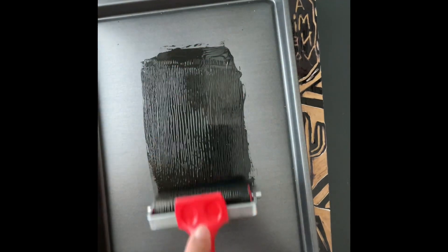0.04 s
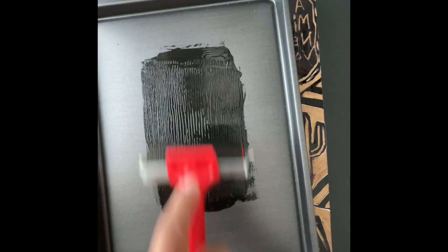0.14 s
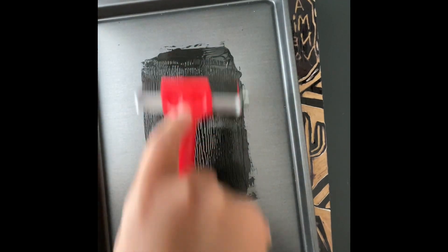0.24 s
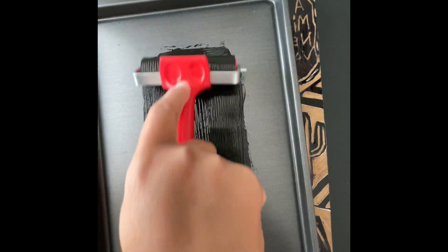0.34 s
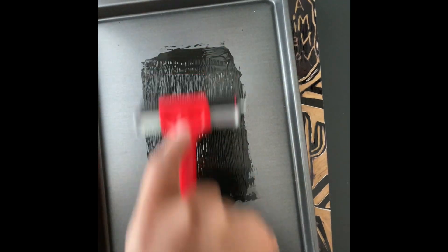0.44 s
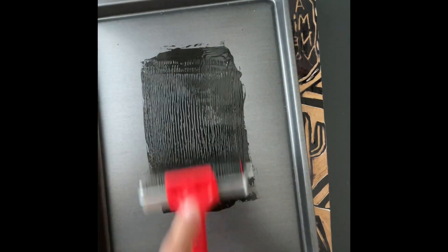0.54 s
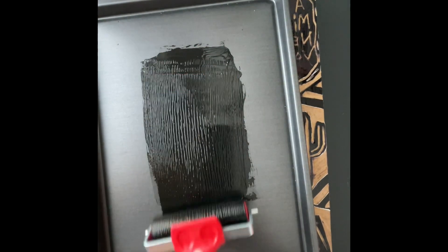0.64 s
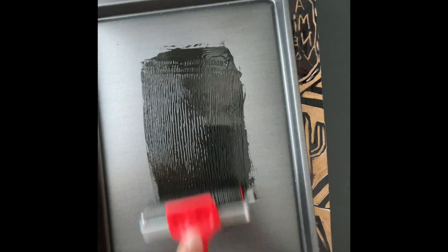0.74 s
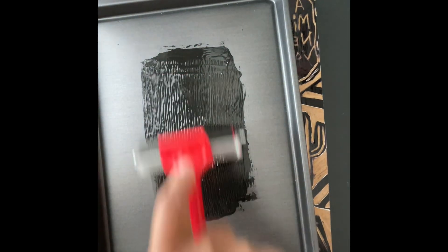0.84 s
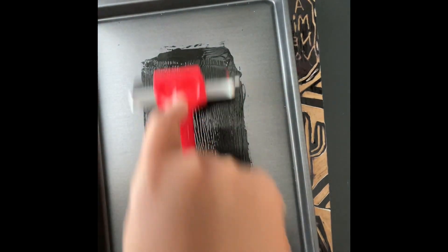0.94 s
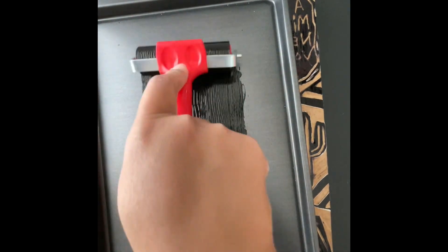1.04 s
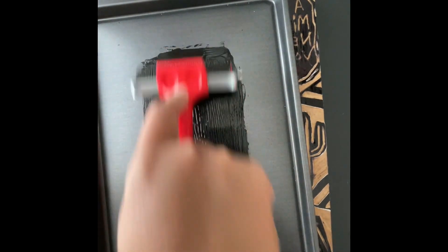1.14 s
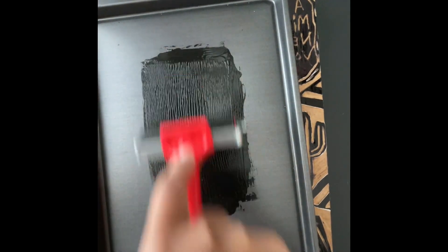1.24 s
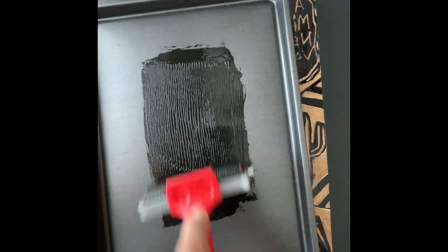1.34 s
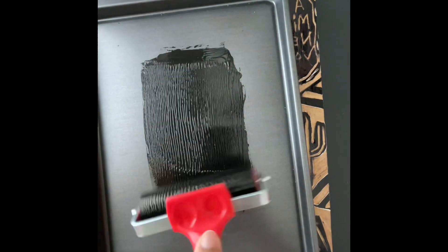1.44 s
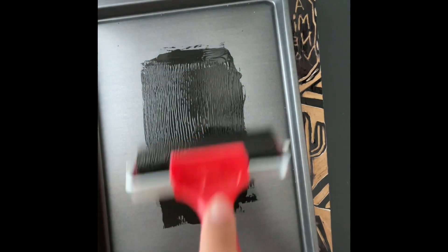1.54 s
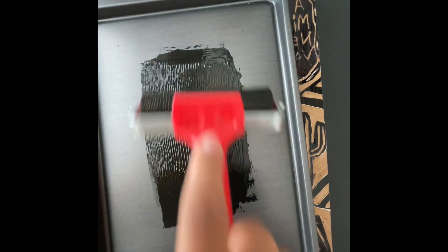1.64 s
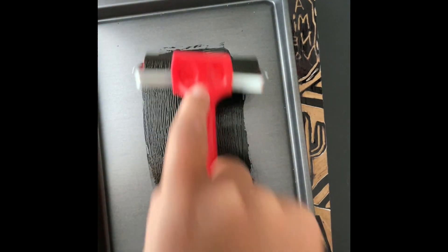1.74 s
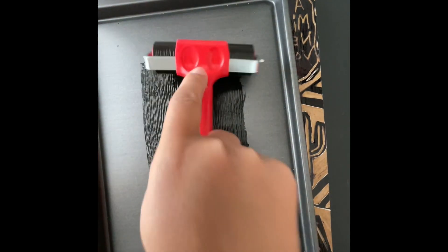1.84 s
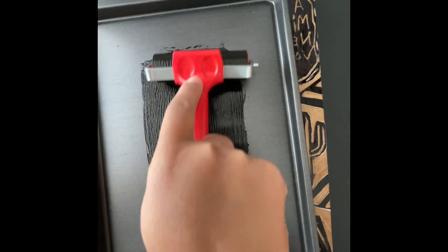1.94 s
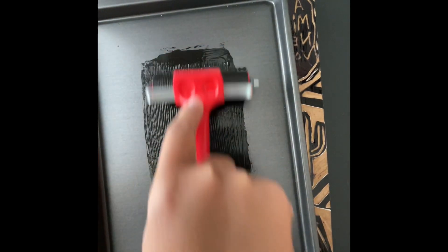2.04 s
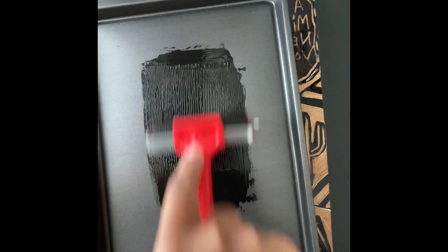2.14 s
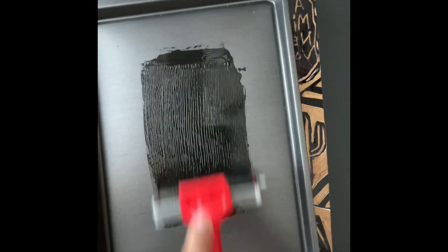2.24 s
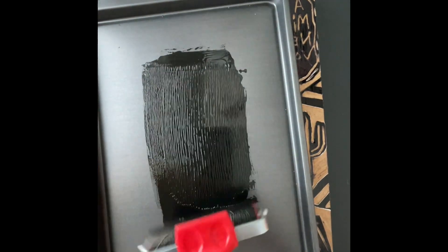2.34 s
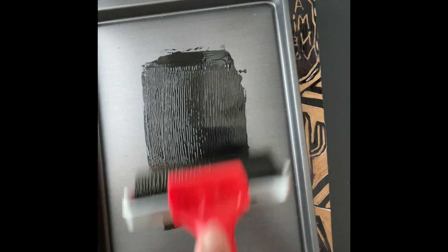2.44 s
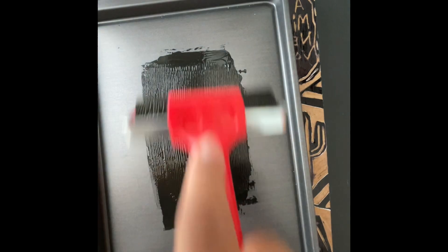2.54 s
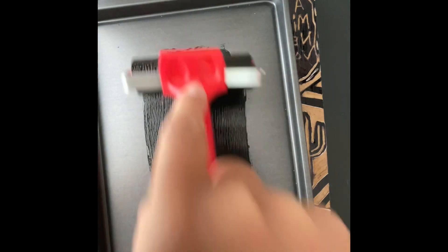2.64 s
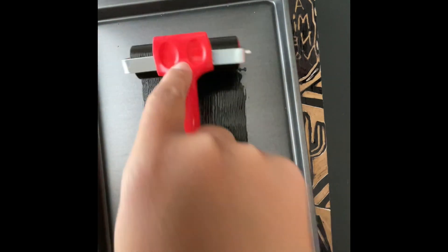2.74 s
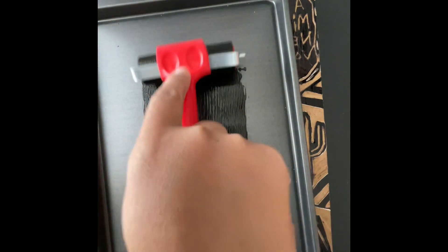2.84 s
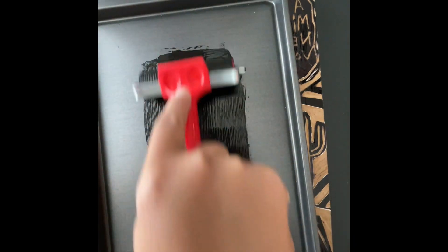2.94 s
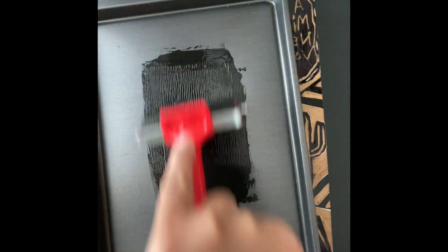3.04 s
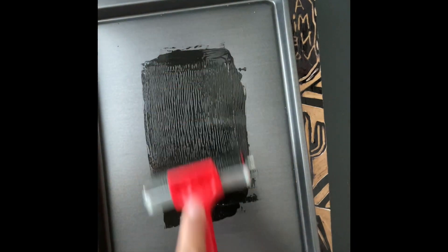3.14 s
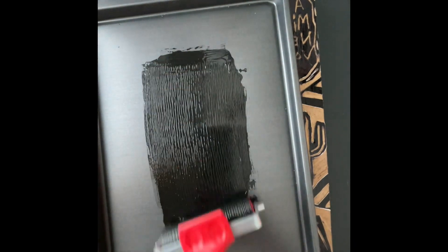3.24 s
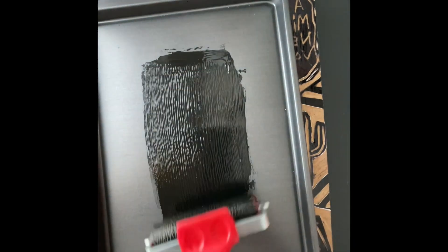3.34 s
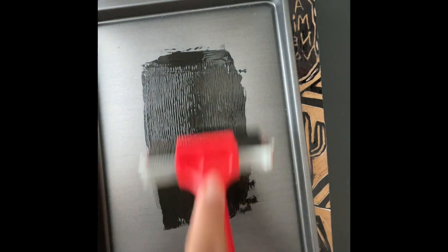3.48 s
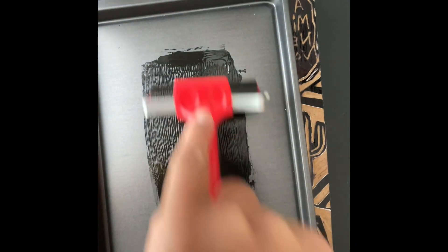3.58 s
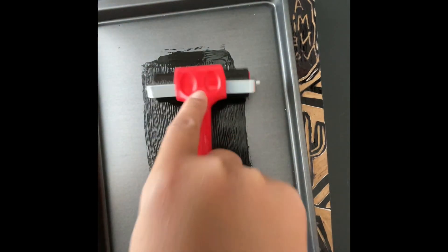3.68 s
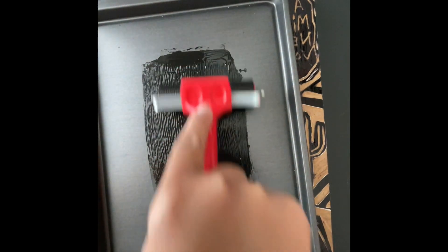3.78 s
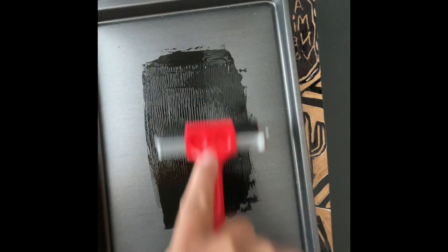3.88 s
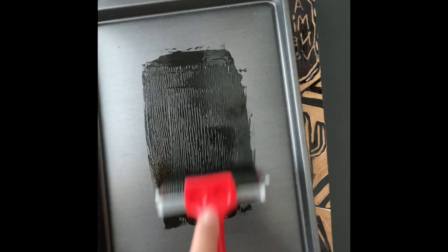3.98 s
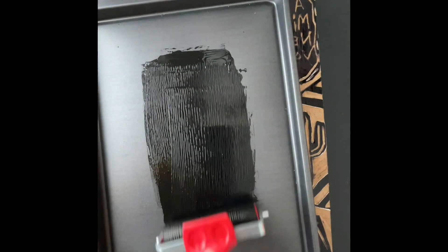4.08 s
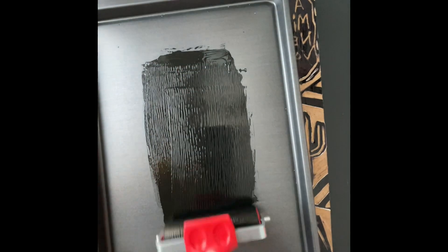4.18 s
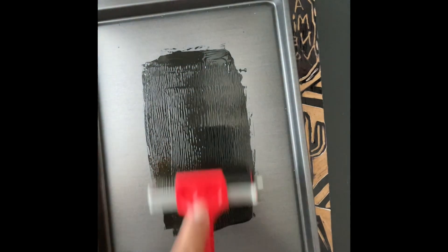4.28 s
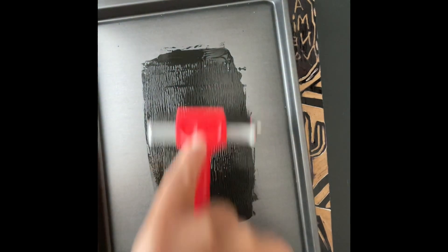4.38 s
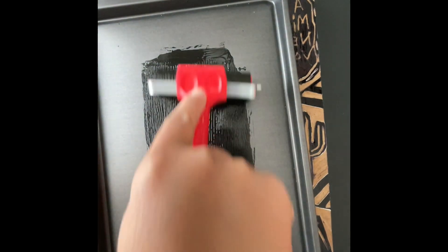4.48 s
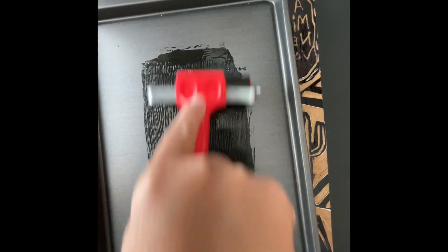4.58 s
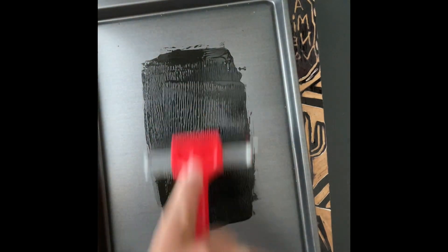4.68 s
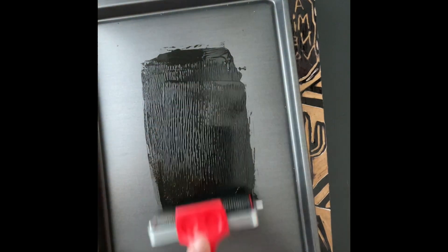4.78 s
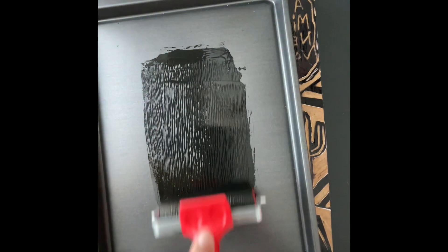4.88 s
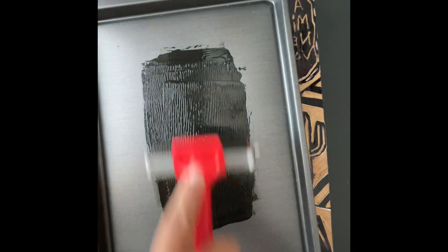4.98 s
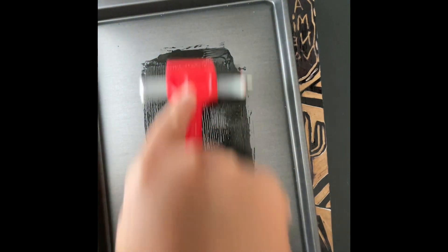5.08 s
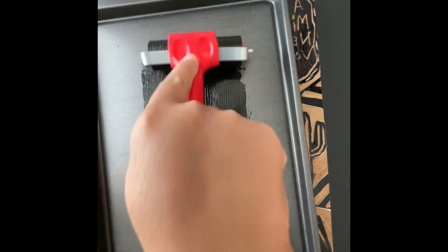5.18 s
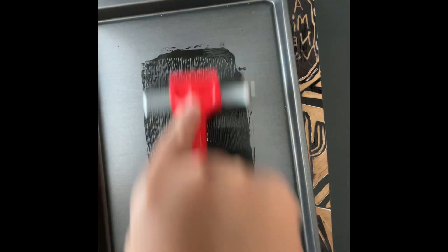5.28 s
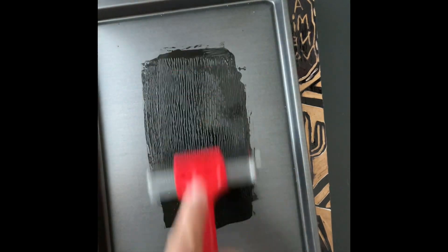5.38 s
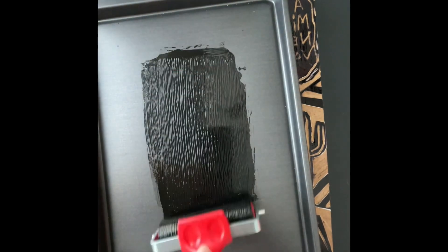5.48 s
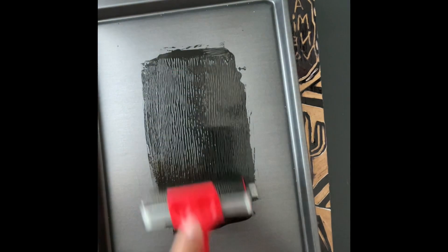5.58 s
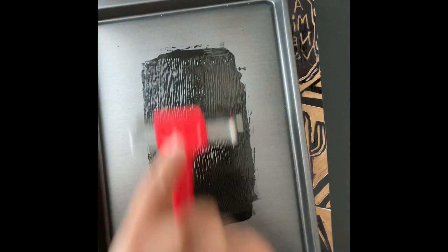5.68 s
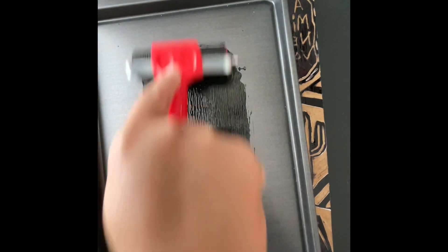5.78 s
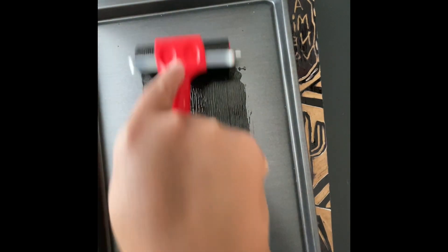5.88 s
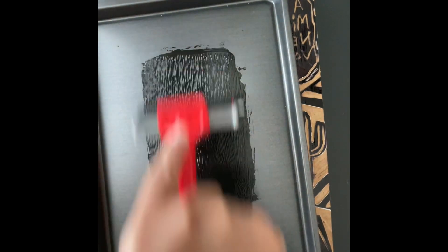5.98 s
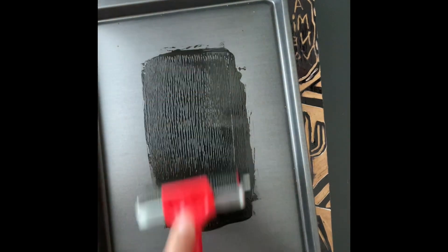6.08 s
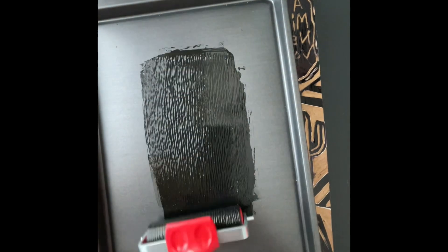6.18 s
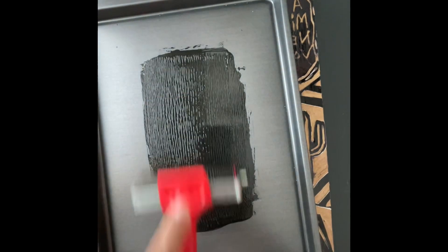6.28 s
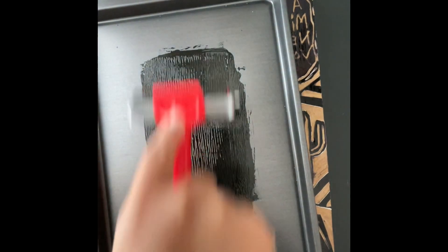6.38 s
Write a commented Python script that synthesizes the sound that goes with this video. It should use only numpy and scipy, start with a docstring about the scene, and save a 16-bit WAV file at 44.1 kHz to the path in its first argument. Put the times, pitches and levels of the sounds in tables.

```python
"""A rubber roller is pushed to and fro through tacky ink on a thin metal tray in a quiet room. Its loose axle
knocks, and these impacts and the lumpy rolling contact drive the tray's resonant modes. The knocks carry bright
ticks, and stretched ink threads give a fine crackle. The sheet rumbles and flexes with low thuds and falling
whoops, and the table booms under it. The sound reaches the two microphone ports of a nearby phone; the right
port resonates at 1-3 kHz."""
import sys
import numpy as np
from scipy import signal
from scipy.fft import rfft, irfft, next_fast_len
from scipy.io import wavfile
from scipy.ndimage import map_coordinates

SR = 44100
rng = np.random.default_rng(int(sys.argv[2]) if len(sys.argv) > 2 else 0)


def dump(signal):
    """Clip the signal to [-1, 1] and save it as 16-bit WAV at the path in sys.argv[1]."""
    limited = np.clip(np.atleast_2d(signal).T, -1, 1)
    pcm = np.round(limited * 32767).astype(np.int16)
    wavfile.write(sys.argv[1], SR, pcm)


N = 283122

# Noise spectra, each with columns: frequency_hz, relative_density_db
ROOM_SPECTRUM = [(15, -36), (25, -16.5), (86, -1.5), (178, -18), (298, -13), (367, -22), (600, -36.5),
                 (1300, -11.5), (2550, -11.5), (3210, -28), (4610, -32), (5970, -48.5), (12000, -58),
                 (15600, -78.5), (22000, -120)]  # the still room
RUMBLE_SPECTRUM = [(15, -45.5), (25, -21), (48, 0), (91, -0.5), (223, 0), (260, -3), (325, -11), (369, -7),
                   (530, -12.5), (700, -14.5), (910, -47.5), (1540, -120)]  # the sheet under the turning roller
CRACKLE_SPECTRUM = [(2200, -38.5), (3000, -7.5), (4000, 0.5), (6000, -8), (8500, -13), (10500, -17.5),
                    (12000, -44), (16000, -75)]  # tiny ink threads breaking
BOOM_SPECTRUM = [(20, -55.5), (35, -16), (60, -1.5), (95, -1.5), (130, -7.5), (200, -27.5), (400, -54)]  # the table under a blow
SNAP_SPECTRUM = [(1800, -22), (3000, -22.5), (3500, -4.5), (6500, -2), (9000, -4), (11000, -1.5),
                 (12000, -10.5), (13000, -22.5), (16000, -75.5)]  # the body of a bright click
SNAP_TOP_SPECTRUM = [(10500, -55), (12000, 0), (13500, -4.5), (15300, 2.5), (16000, -15), (16800, -19.5)]  # its highest treble
CLATTER_SPECTRUM = [(350, -57), (600, -14.5), (1200, -6), (2600, -5), (3300, -10.5), (5200, -12),
                    (7000, -27), (10000, -37), (13000, -70.5)]  # the broad clatter of a knock

# Level of the left port against the right: frequency_hz, gain_db
LEFT_GAIN = [(60, 0.5), (99, -2), (160, -2), (270, -0.5), (450, -3.5), (740, -13.5), (1220, -9.5),
             (2010, -19), (3330, -2.5), (5500, 1), (9080, 0), (15000, 0.0)]
# Phase of the left port against the right: frequency_hz, lead_rad
LEFT_PHASE = [(50, -.1), (300, -.3), (520, -1.5), (750, -.4), (1000, 1), (1450, 2.7), (1900, 2.4),
              (2400, .5), (3000, -1.3), (4500, -2.7), (6300, -2.3), (8000, -.3), (9200, 0), (11500, 3.1),
              (14000, 5.4), (16000, 6.3)]
# Likeness of the noise at the two ports: frequency_hz, correlation
PORT_CORRELATION = [(60, .985), (300, .8), (1000, .93), (1800, .7), (3500, .45), (5500, .5), (7500, .85),
                    (12000, .92)]

# Low bending modes of the sheet: pitch_hz, bandwidth_hz, relative_db
SHEET_MODES = [(193.4, 42, -1), (256.2, 19, -2), (368.7, 39.4, -1.5), (436, 35, -9)]
# Ringing modes of the tray, the upper ones lifted by the right port: pitch_hz, bandwidth_hz, relative_db
TRAY_MODES = [(813.5, 31.6, -15.5), (943, 54, -6.5), (1001.6, 65, -1.5), (1088, 52, -6.5), (1276, 42, -6.5),
              (1449, 57, -6), (1575, 55, -8.5), (1771, 76, -3.5), (1852, 39, -4), (1909, 69, -4),
              (2166, 82, -7.5), (2206, 79, -6.5), (2336, 36, -4), (2424, 76, -1), (2600, 31, -7.5),
              (2650, 54, -12.5)]
# Bending waves reflected from the rims: mean_delay_s, gain_db
RIM_ECHOES = [(.02, -10), (.038, -13)]

# Event levels and decay times are nominal; each layer applies its own offsets and factors.
# Pushes of the roller, SWELL_DB down at the ends of rise and fall: peak_s, level_db, rise_s, fall_s
PUSHES = [(0.14, -58, 0.083, 0.25), (0.57, -64.5, 0.54, 0.29), (0.84, -60, .3, 0.53),
          (1.32, -55, 0.13, 0.16), (1.97, -49.5, 0.036, 0.066), (2.13, -63, 0.12, 0.51),
          (2.319, -49, 0.12, 0.12), (2.92, -61.5, 0.045, .3), (3.09, -62.5, 0.39, 0.35),
          (3.339, -55.5, 0.41, 0.09), (3.75, -58, 0.13, 0.2), (4.08, -65.5, 1, 0.11),
          (4.378, -58, 0.25, 0.081), (4.671, -60, 0.2, 0.35), (5.02, -55.5, 0.21, 0.23),
          (5.361, -58, 0.3, 0.26), (5.7, -59, 0.24, .4), (6.08, -53.5, 0.15, 0.15), (6.3, -54.5, .06, 0.6),
          (6.42, -49.5, 0.19, .3)]
# Course of the ink's crackle: time_s, level_db
CRACKLE_LEVELS = [(0, -88), (0.2, -93), (0.48, -84.5), (0.71, -79), (1.0, -81), (1.2, -101), (1.33, -70),
                  (1.63, -104), (1.85, -104), (2.1, -93.5), (2.38, -78), (2.7, -99), (2.82, -102),
                  (2.91, -90.5), (3.22, -81), (3.36, -90), (3.65, -67), (3.9, -82), (4.24, -77.5),
                  (4.45, -97), (4.75, -81.5), (5.0, -84.5), (5.93, -79.5), (6.18, -91), (6.3, -74),
                  (6.42, -83)]
# Flexes of the sheet: start_s, level_db, first_pitch_hz, last_pitch_hz, t60_s
FLEXES = [(0.22, -42, 442, 70, 0.14), (0.546, -47, 293, 70, 0.25), (.899, -43, 410, 85.7, 0.19),
          (3.285, -40.5, 314, 68, 0.18), (3.504, -39.5, 410, 91, 0.17), (3.961, -47.5, 235, 197.3, 0.29),
          (4.078, -49.5, 298, 71, 0.46), (4.963, -44.5, 315, 63.4, 0.11), (5.63, -41, 284, 72, 0.074),
          (6.158, -53, 150, 65.4, 0.18), (6.355, -44, 344, 92, 0.14)]
# Blows that reach the bending modes: start_s, level_db, boom_relative_db
BLOWS = [(0.353, -62, -4), (0.787, -57, 1), (1.893, -28.5, -14), (1.908, -31, -6.5), (2.12, -65, -6),
         (2.218, -45.5, -4.5), (2.305, -39.5, -17), (2.871, -31, -5), (3.152, -49.5, -5.5),
         (3.275, -36, -14), (3.692, -21.5, -17.5), (4.073, -53, -18), (4.317, -47, -23.5),
         (4.738, -48, -24), (4.956, -42.5, -8), (5.242, -52.5, -19.5), (5.4, -45, -25), (5.625, -44, -12.5),
         (6.159, -71, 6), (6.358, -46, -11)]
# Bright clicks of the knocks: start_s, level_db, top_relative_db
BRIGHT_CLICKS = [(0.3795, -60, -27), (0.6399, -42.5, -11), (0.7332, -56, -16), (0.824, -56.5, -18),
                 (0.9293, -62.5, -15), (0.993, -47.5, -20), (1.0125, -55, -13), (1.1584, -45.5, -9.5),
                 (1.167, -45.5, -17), (1.3298, -57, -18), (1.3468, -54, -12.5), (1.3925, -44.5, -7),
                 (1.8198, -53.5, -8.5), (1.8865, -29, -13.5), (1.9065, -29.5, -8), (2.2662, -54.5, -6.5),
                 (2.2806, -47, -15), (2.3052, -56.5, -21), (2.3511, -44.5, -6.5), (2.4471, -46.5, -16),
                 (2.4565, -49, -12.5), (2.8678, -27.5, -13), (3.0744, -62, -25), (3.15, -62, -32),
                 (3.2439, -46, -24), (3.2558, -43.5, -20), (3.3383, -61, -33), (3.4417, -50.5, -8.5),
                 (3.5346, -44.5, -8.5), (3.6882, -27, -12.5), (4.0672, -52, -20), (4.0881, -44.5, -8.5),
                 (4.2384, -50, -13.5), (4.2887, -58.5, -14), (4.3505, -61, -15), (4.379, -58, -27),
                 (4.4084, -51.5, -19), (4.7688, -49.5, -13), (4.7838, -63, -15), (4.8858, -58, -11),
                 (4.9048, -52, -11), (4.9511, -56.5, -8), (4.9588, -51.5, -12), (5.0963, -53.5, -18),
                 (5.2213, -55.5, -28), (5.442, -48, -17), (5.4832, -59, -6.5), (5.5593, -56, -15),
                 (5.5753, -45.5, -14), (5.7633, -51, -16), (5.7994, -40.5, -13), (5.903, -53.5, -14),
                 (5.915, -62, -10), (6.0636, -50.5, -15), (6.0994, -46, -16.5), (6.112, -47, -13),
                 (6.127, -46.5, -12), (6.2426, -51, -19), (6.2575, -46.5, -16), (6.2696, -47.5, -13),
                 (6.332, -61, -13), (6.3899, -52.5, -23)]
# Axle and frame knocks: start_s, level_db, low_modes_relative_db, clatter_relative_db, t60_s
AXLE_KNOCKS = [(0.024, -44.5, -1.5, -28, 0.057), (0.074, -32.5, -14, -29.5, .06),
               (0.114, -36.5, -11.5, -23.5, 0.12), (0.171, -42, -12.5, -30, 0.12),
               (0.234, -53, -0.5, -13.5, 0.079), (0.354, -45, -6.5, -23, 0.11),
               (0.517, -40, -12, -37, 0.16), (0.636, -50, -21, -19, 0.11), (0.784, -38, -11, -39, 0.13),
               (0.809, -34.5, -13, -28, 0.099), (0.994, -47, -3, -21, 0.11),
               (1.138, -52.5, -4.5, -19.5, 0.42), (1.276, -41, -6, -35, 0.074),
               (1.301, -47.5, -8, -14, 0.061), (1.334, -30.5, -19, -19, 0.027),
               (1.347, -38, -26, -14.5, 0.071), (1.392, -32.5, -41, -12, 0.055),
               (1.82, -40, -21, -14, 0.048), (1.884, -15, -9.5, -17.5, .1),
               (1.897, -24.5, -19, -10.5, 0.057), (1.907, -19, -2, -13, 0.089),
               (1.931, -23.5, -12, -26, 0.096), (2.078, -43, -15, -32.5, .076),
               (2.24, -40, 2.6, -23.5, 0.094), (2.267, -46, -13, -7.5, 0.13), (2.28, -46, -3, -8.5, 0.15),
               (2.307, -32.5, -3, -21, 0.067), (2.348, -32.5, -40, -13, 0.039),
               (2.447, -24.5, -26, -21, 0.022), (2.455, -39.5, -24.5, -11, 0.063),
               (2.588, -57, -17, -21.5, 0.053), (2.61, -52.5, -10, -20.5, 0.056),
               (2.696, -49, -15, -31, 0.028), (2.869, -21, -5, -14.5, 0.12), (3.05, -55, 1.5, -28, .09),
               (3.073, -46, -11.5, -24, 0.1), (3.153, -33.5, -17, -29, 0.04), (3.25, -32, -5.5, -16, .14),
               (3.279, -36.5, -4.5, -23, .11), (3.356, -48, -28, -20, 0.037),
               (3.438, -37.5, -21, -15.5, 0.034), (3.532, -31.5, -25.5, -14, .042),
               (3.678, -33, -24, -19, .06), (3.688, -12.5, -1.5, -17.5, 0.086), (3.702, -19, -7, -41, 0.14),
               (4.232, -52, -2.5, -23, 0.18), (4.326, -35.5, -5.5, -23, 0.093),
               (4.607, -45, -2.5, -31.5, 0.045), (4.659, -40.5, -6, -34, 0.13),
               (4.724, -39.5, -2, -26, 0.11), (4.739, -37.5, -9, -34, 0.2), (4.786, -41, -13, -26.5, 0.096),
               (4.938, -39.5, -1, -22, 0.091), (4.966, -31.5, -21, -20, 0.096),
               (4.981, -39.5, 3.5, -32, 0.065), (5.108, -56, 7, -30, 0.055), (5.2, -42.5, -17, -21.5, 0.16),
               (5.232, -46.5, 0.5, -23.5, 0.14), (5.374, -44.5, -7.5, -35, 0.34),
               (5.412, -40, -9.5, -29, 0.23), (5.567, -39.5, -11, -32, 0.22), (5.61, -47.5, 1, -21, .1),
               (5.641, -33.5, -16, -31, .13), (5.667, -37.5, -4.5, -26.5, 0.13),
               (5.797, -45, -10.5, -20, 0.089), (5.865, -52.5, -3.5, -22, 0.14),
               (6.013, -45.5, -6.5, -31, 0.12), (6.046, -46, -1, -25, 0.068),
               (6.082, -34.5, -14.5, -29.5, 0.1), (6.135, -40.5, -29, -18.5, 0.082),
               (6.241, -42, -14, -22, 0.3), (6.283, -44, -2, -30, 0.13), (6.339, -33.5, -12, -25.5, 0.13),
               (6.389, -32.5, -7, -18.5, 0.066)]

ROOM_DB, SWELL_DB = -71.5, 20
FAMILY_BORDERS_HZ = (1500, 2290)  # between the tray's low, middle and top modes
BAND_LIMIT_HZ = 16900


def amp(db):
    """Amplitude ratio: tenfold for every 20 dB."""
    return 10 ** (np.asarray(db) / 20)


def unit_rms(x):
    """Normalisation to a mean power of one."""
    return x / np.sqrt(np.mean(x ** 2) + 1e-20)


def curve_at(points, hz):
    """Interpolation along a logarithmic frequency axis."""
    knot_hz, values = np.transpose(points)
    return np.interp(np.log(hz + 1), np.log(knot_hz + 1), values)


def wobble(rate_hz):
    """Smooth random modulation: a spline through Gaussian knots."""
    knots = rng.standard_normal(int(N * rate_hz / SR) + 4)
    return map_coordinates(knots, [np.arange(N) * rate_hz / SR])


def filtered(x, response):
    """Linear filtering: the spectrum is multiplied by a complex frequency response."""
    size = next_fast_len(N + SR // 2)
    return irfft(rfft(x, size) * response(np.fft.rfftfreq(size, 1 / SR)), size)[..., :N]


def noise(spectrum):
    """Spectral shaping of two independent white noises, scaled to unit power."""
    return unit_rms(filtered(rng.standard_normal((2, N)), lambda hz: amp(curve_at(spectrum, hz))))


def shot_noise(per_s, spread_db, cap_db, decay_s):
    """Shot noise: randomly timed pulses, many small and a few large, each decaying exponentially."""
    arrivals = rng.random(N) < per_s / SR
    sizes = amp(np.minimum(spread_db * rng.exponential(size=N), cap_db))
    return signal.lfilter([1], [1, -np.exp(-1 / (decay_s * SR))], arrivals * sizes)


def bursts(start_s, level_db, t60_s, crack_db, crack_t60_s, rise_s):
    """Incoherent impacts add in power; the envelope of each is a short crack over a dying tail."""
    power, t = np.zeros(N + SR), np.arange(SR // 4) / SR
    crack = amp(-60 * t / crack_t60_s)
    impacts = np.broadcast(start_s, level_db, np.clip(t60_s, .01, 1), crack_db, rise_s + 1e-5)
    for start, db, t60, sharp_db, rise in impacts:
        shape = (amp(-60 * t / t60) + amp(sharp_db) * crack) * (1 - np.exp(-t / rise))
        power[round(start * SR):][:len(t)] += (amp(db) * shape) ** 2
    return np.sqrt(power[:N])


def resonate(envelopes, modes, drift_db, drift_hz):
    """Forced resonance: noise drives each mode, whose share drifts as the contact point moves."""
    ring, force = np.zeros((2, N)), rng.standard_normal((2, N))
    knots = np.arange(int(N * drift_hz / SR) + 2) * SR / drift_hz
    for envelope, (hz, width, db) in zip(envelopes, modes):
        share = np.interp(np.arange(N), knots, amp(db + drift_db * rng.standard_normal(len(knots))))
        # the second, wider stage trims the skirts of the resonance
        stages = [np.concatenate(signal.iirpeak(hz, hz / w, SR)) for w in (width, 6 * width)]
        ring += signal.sosfilt(stages, envelope * share * force) * np.sqrt(SR / (np.pi * width))
    return ring / np.sqrt(sum(amp(2 * db) for _, _, db in modes))


def push_level_db():
    """Exponential growth and decay of each push; the strongest sets the level of the rolling contact."""
    t = np.arange(N) / SR
    swells = [db - SWELL_DB * np.maximum((peak_s - t) / rise_s, (t - peak_s) / fall_s)
              for peak_s, db, rise_s, fall_s in PUSHES]
    return np.max(swells, axis=0)


def room_hush():
    """Stationary noise: the steady background of a still room."""
    return amp(ROOM_DB) * noise(ROOM_SPECTRUM)


def rolling_rumble():
    """Forced vibration: the turning roller shakes the sheet, more strongly with each push."""
    level_db = np.maximum(-62 + 0.69 * (push_level_db() + 59), -91)  # the floor is the lifted roller
    return amp(level_db + 4.4 * wobble(11)) * noise(RUMBLE_SPECTRUM)


def ink_crackle():
    """Superposition: many tiny thread ruptures merge into a grainy hiss."""
    level_db = np.interp(np.arange(N) / SR, *np.transpose(CRACKLE_LEVELS))
    grain = .8 + 0.55 * shot_noise(per_s=140, spread_db=3, cap_db=9, decay_s=.004)
    return amp(level_db + 0.67 * wobble(34)) * unit_rms(grain) * noise(CRACKLE_SPECTRUM)


def sheet_whoops():
    """Dispersion: high bending waves arrive first, so the pitch falls; the rims reflect them."""
    whoops, t = np.zeros(N + SR), np.arange(SR // 3) / SR
    direct_path = (0.00048, 0.019)  # mean_delay_s, gain_db
    for start_s, db, first_hz, last_hz, t60_s in FLEXES:
        pitch_hz = last_hz + (first_hz - last_hz) * np.exp(-t / 0.0089)
        attack = (1 - np.exp(-t / 0.0059)) * (1 + 0.82 * np.exp(-t / 0.0063))
        wave = amp(db - 60 * t / t60_s) * attack * np.sin(2 * np.pi * np.cumsum(pitch_hz) / SR)
        for delay_s, gain_db in [direct_path, *RIM_ECHOES]:
            arrival_s = start_s + delay_s * rng.uniform(.8, 1.2)
            whoops[round(arrival_s * SR):][:len(t)] += amp(gain_db) * wave
    return amp(2.2 * wobble(70)) * whoops[:N]  # the ink damps the sheet unevenly


def sheet_thuds():
    """Impact excitation: a blow rings the sheet's bending modes and the table booms under it."""
    start_s, db, boom_db = np.transpose(BLOWS)
    t60_s = 0.18
    blow = bursts(start_s, db - 4.5, t60_s, crack_db=-4.5, crack_t60_s=.02, rise_s=.001)
    bending = resonate([blow] * len(SHEET_MODES), SHEET_MODES, drift_db=5, drift_hz=10)
    bending = filtered(bending, lambda hz: 1 / (1 + 1j * hz / 600) ** 2)  # low-pass
    boom = bursts(start_s + .01, db + boom_db, 1.6 * t60_s, crack_db=-9.5, crack_t60_s=.02, rise_s=.01)
    return bending + boom * noise(BOOM_SPECTRUM)


def bright_clicks():
    """Bright edge of a knock: the hard blow gives a sharp click and leaves a short fizz."""
    start_s, db, top_db = np.transpose(BRIGHT_CLICKS)
    t60_s = 0.11
    body = bursts(start_s, db - 16.5, t60_s, crack_db=14, crack_t60_s=.014, rise_s=.0025)
    top = bursts(start_s, db + top_db - 5.5, 0.87 * t60_s, crack_db=18.5, crack_t60_s=.011, rise_s=.002)
    return amp(2.5 * wobble(250)) * (body * noise(SNAP_SPECTRUM) + top * noise(SNAP_TOP_SPECTRUM))


def rolling_force():
    """Roughness excitation: lumps of ink jolt the roller and modulate the contact force's envelope."""
    pushes = amp(push_level_db() + 3.07 * wobble(30) + 3.38 * wobble(110))
    lumps = shot_noise(per_s=60, spread_db=4, cap_db=12, decay_s=.0054)
    return pushes * (0.75 + 0.34 * lumps)


def roller_on_tray():
    """Modal response: axle knocks and the rolling contact ring the tray; knocks also clatter broadly."""
    start_s, db, low_db, clatter_db, t60_s = np.transpose(AXLE_KNOCKS)
    top_db = -11.5 - 92.5 * (t60_s - .1)  # short, hard knocks ring the top modes more
    crack_db = 0.5 - 0.027 * low_db  # thin knocks with weak low modes crack harder
    rise_s = 0.0012
    chatter = amp(1.94 * wobble(150))
    # soft rubber touches just before the frame
    rubber = bursts(start_s - .011, db - 22.5, .044, crack_db=-33, crack_t60_s=.012, rise_s=.007)
    contact = np.hypot(rolling_force(), rubber)
    low = bursts(start_s, db + low_db - 2, 1.016 * t60_s, crack_db, crack_t60_s=.013, rise_s=rise_s)
    middle = bursts(start_s, db - 7.5, t60_s, crack_db, crack_t60_s=.0084, rise_s=rise_s)
    top = bursts(start_s, db + top_db, 1.44 * t60_s, crack_db, crack_t60_s=.014, rise_s=rise_s)
    families = [np.hypot(chatter * knocks, amp(contact_db) * contact)
                for knocks, contact_db in [(low, -0.5), (middle, 0), (top, -3.5)]]
    envelopes = [families[np.searchsorted(FAMILY_BORDERS_HZ, hz)] for hz, _, _ in TRAY_MODES]
    ring = resonate(envelopes, TRAY_MODES, drift_db=3.5, drift_hz=16)
    # the ringing stays between about 600 Hz and 3 kHz
    ring = filtered(ring, lambda hz: 1 / (1 + 1j * hz / 3000) ** 3 * (1j * hz / (600 + 1j * hz)) ** 2)
    clatter = bursts(start_s, db + clatter_db + 4, 1.5 * t60_s, crack_db - 3,
                     crack_t60_s=.019, rise_s=0.91 * rise_s)
    return amp(8) * ring + chatter * clatter * noise(CLATTER_SPECTRUM)


def microphone_ports(pair):
    """Partial coherence: the right port hears the first signal, the left a phase-shifted mix of both."""
    def response(hz):
        ratio = amp(curve_at(LEFT_GAIN, hz))
        correlation = np.clip(curve_at(PORT_CORRELATION, hz), 0, 1)
        left = 2 * ratio / (1 + ratio) * np.exp(1j * curve_at(LEFT_PHASE, hz))
        return np.array([left * correlation, left * np.sqrt(1 - correlation ** 2), 2 / (1 + ratio)])
    left_common, left_own, right = filtered(pair[[0, 1, 0]], response)
    return np.array([left_common + left_own, right])


def scene():
    """Superposition: the pressures from tray, ink and room add at the two ports."""
    events = roller_on_tray() + bright_clicks() + sheet_thuds() + sheet_whoops()
    return microphone_ports(events + rolling_rumble() + ink_crackle() + room_hush())


def record(dry):
    """Band limiting: the phone passes nothing above its highest frequency."""
    return filtered(dry, lambda hz: hz < BAND_LIMIT_HZ)


dry = scene()
out = record(dry)
dump(out)
```